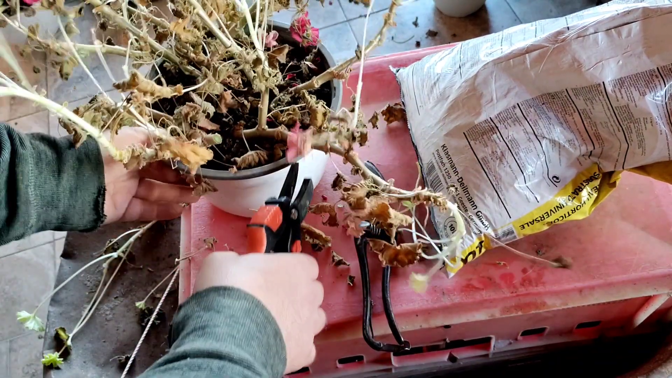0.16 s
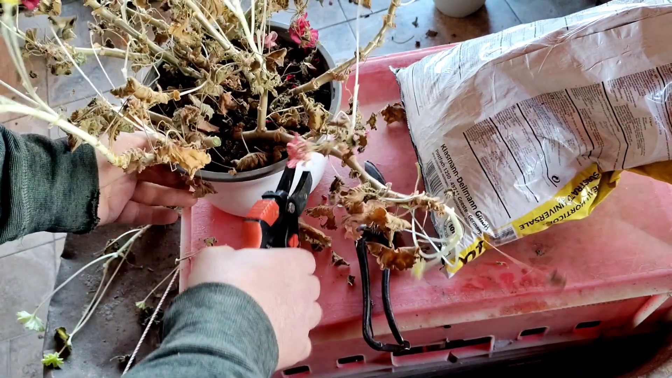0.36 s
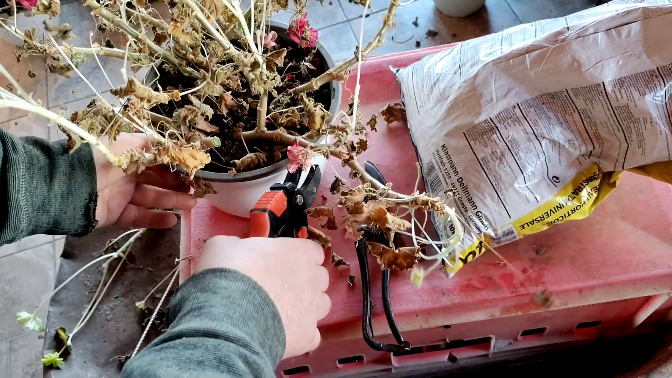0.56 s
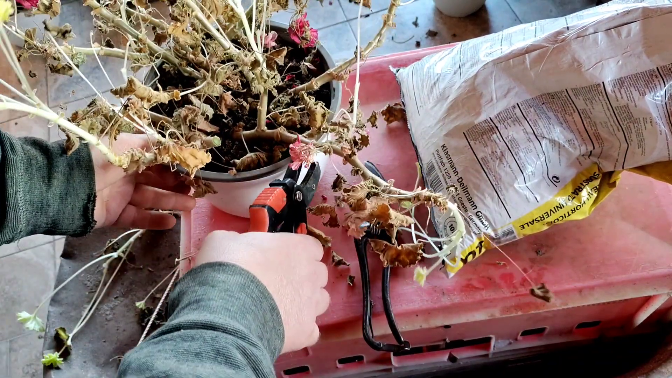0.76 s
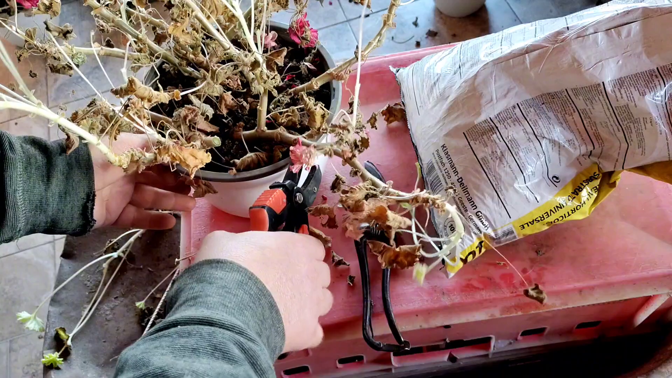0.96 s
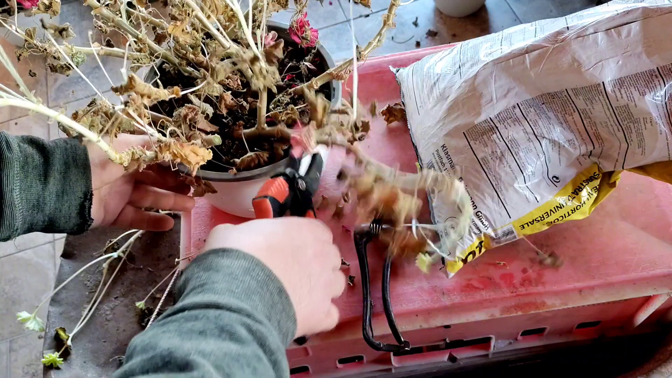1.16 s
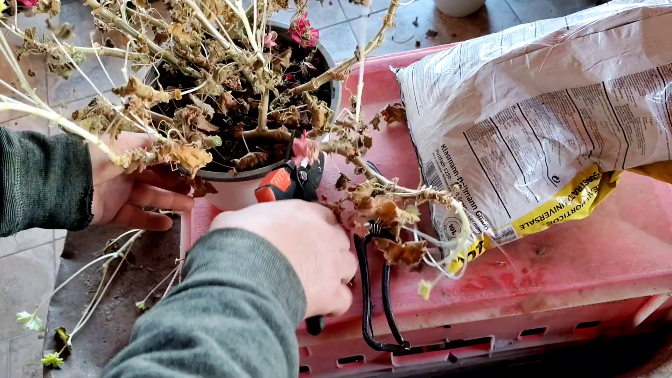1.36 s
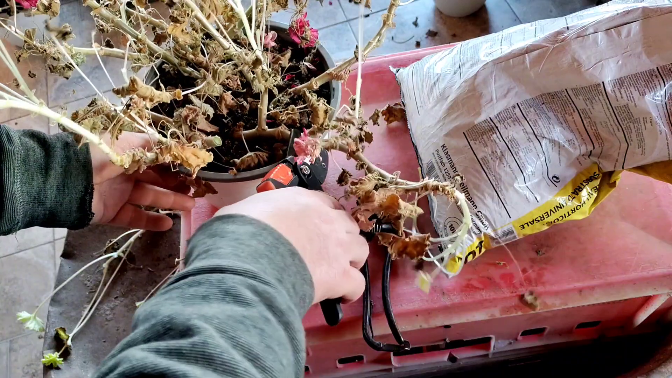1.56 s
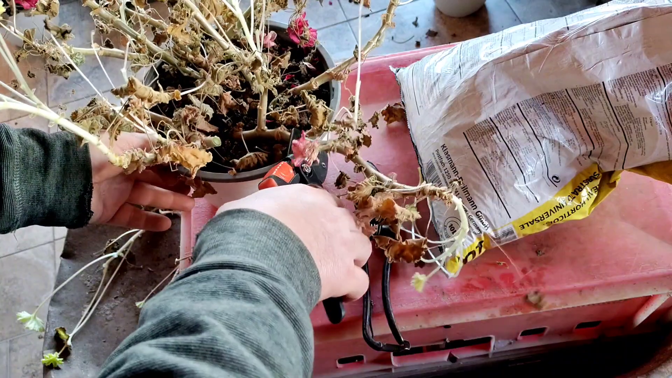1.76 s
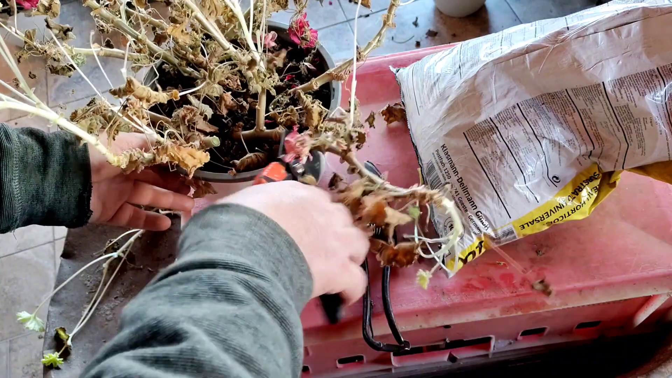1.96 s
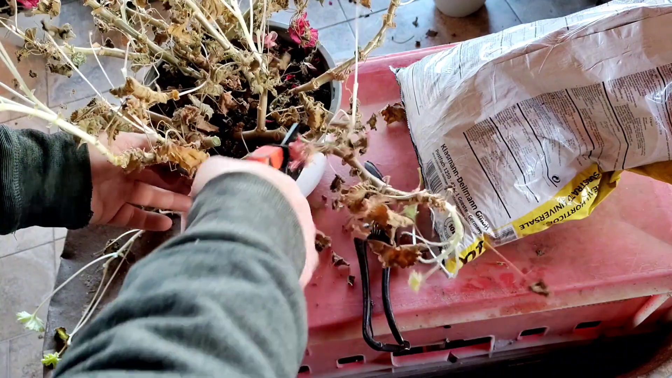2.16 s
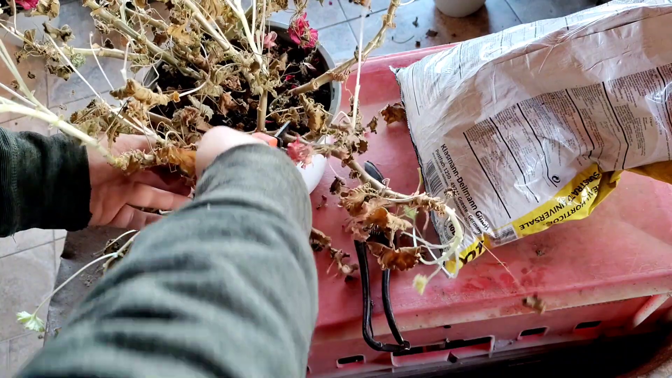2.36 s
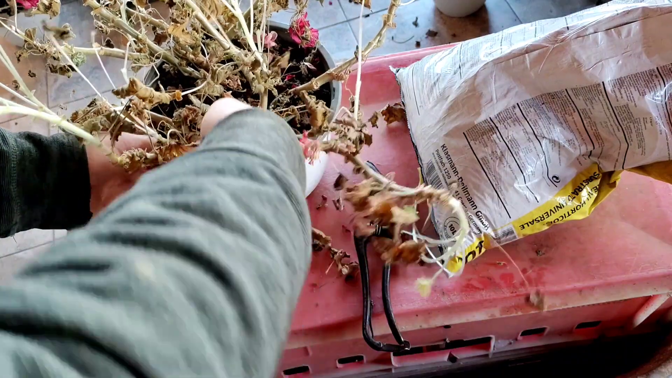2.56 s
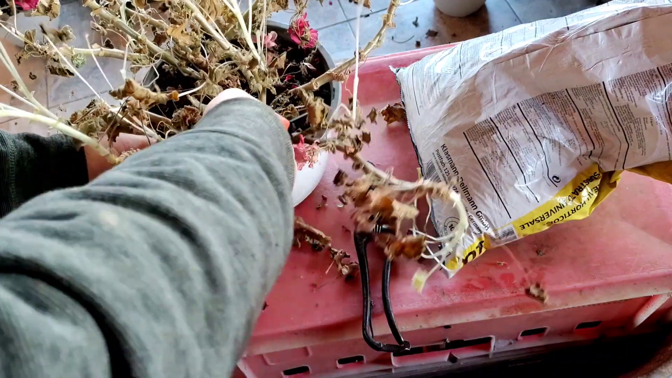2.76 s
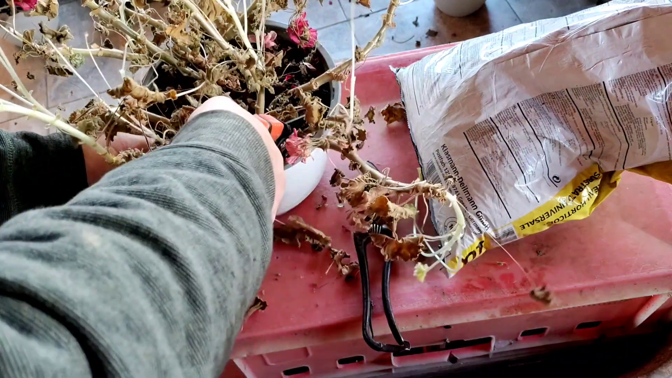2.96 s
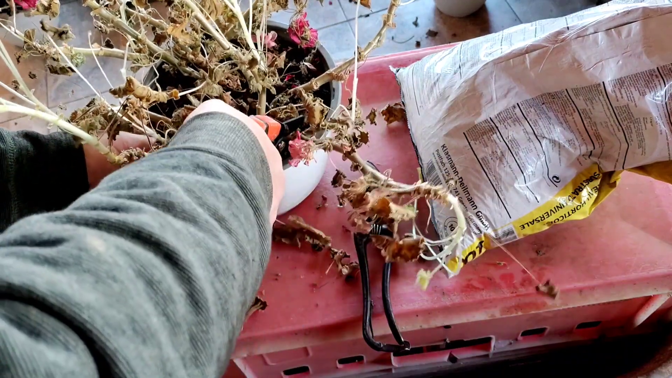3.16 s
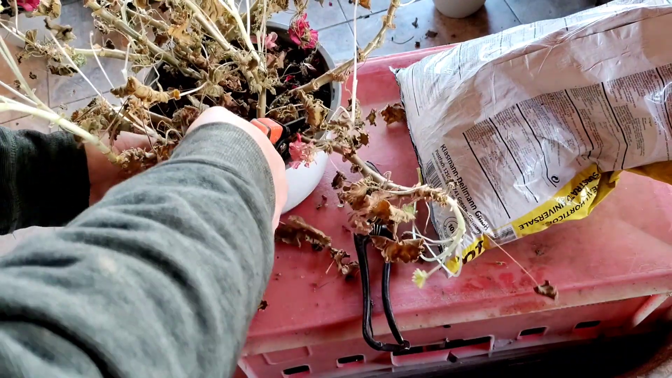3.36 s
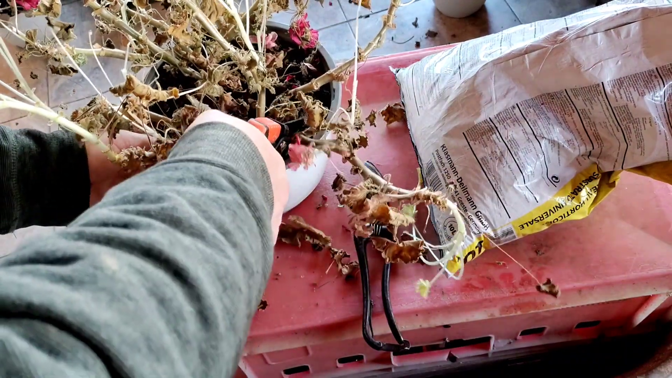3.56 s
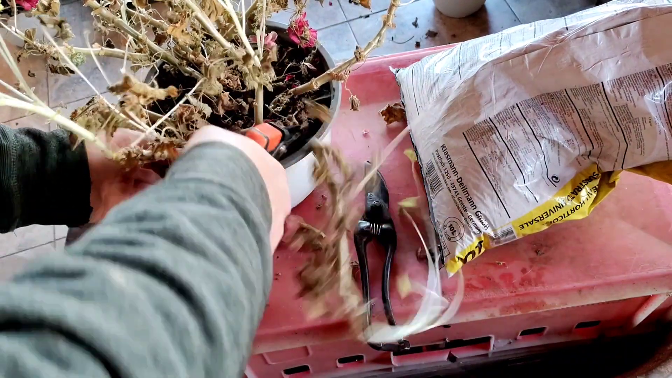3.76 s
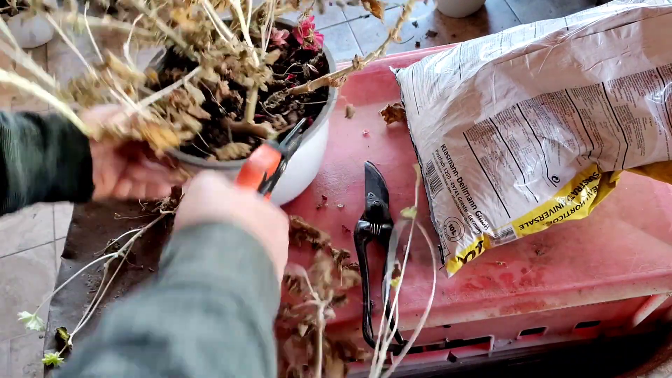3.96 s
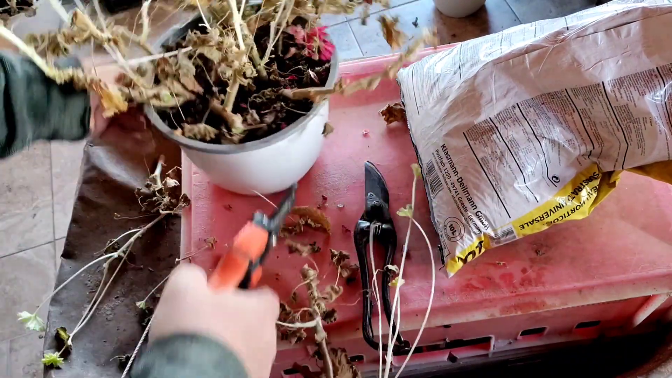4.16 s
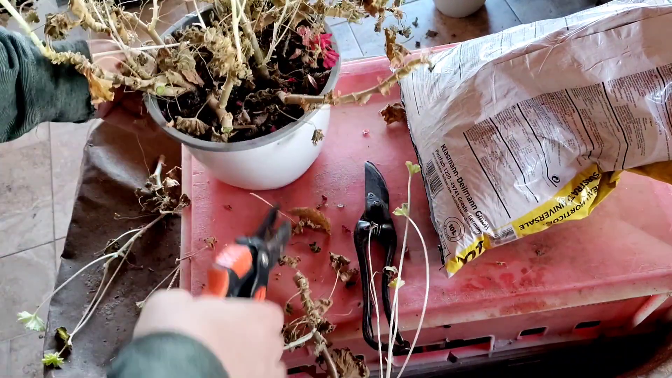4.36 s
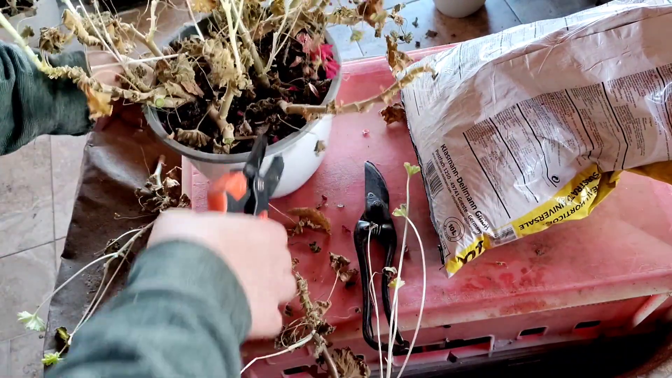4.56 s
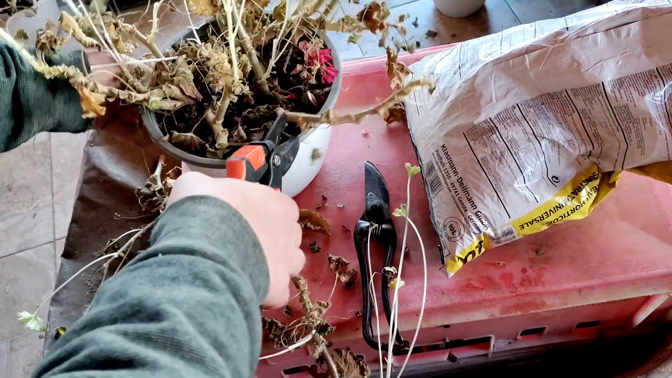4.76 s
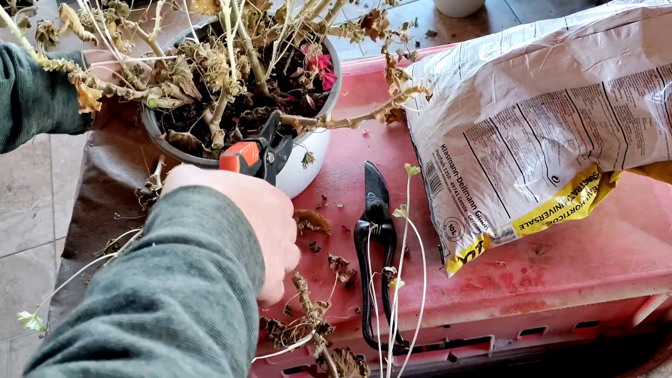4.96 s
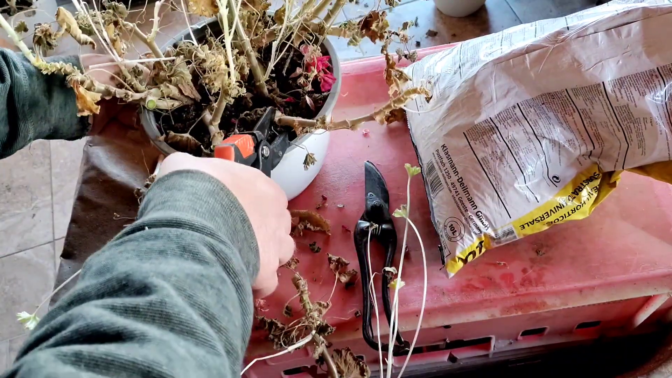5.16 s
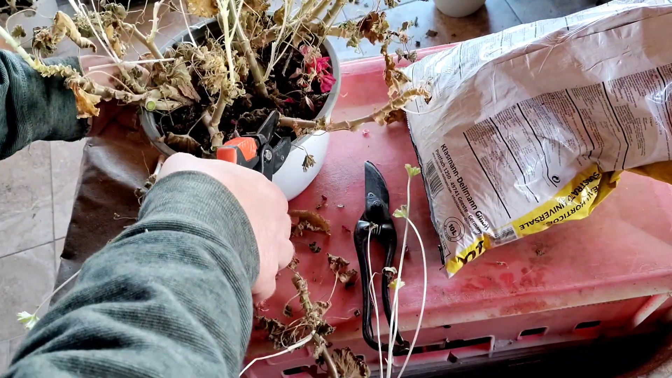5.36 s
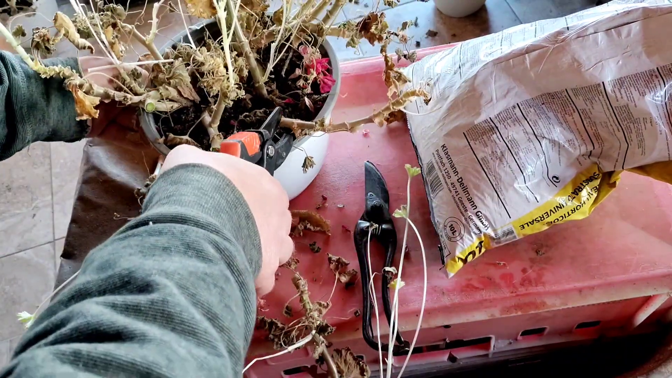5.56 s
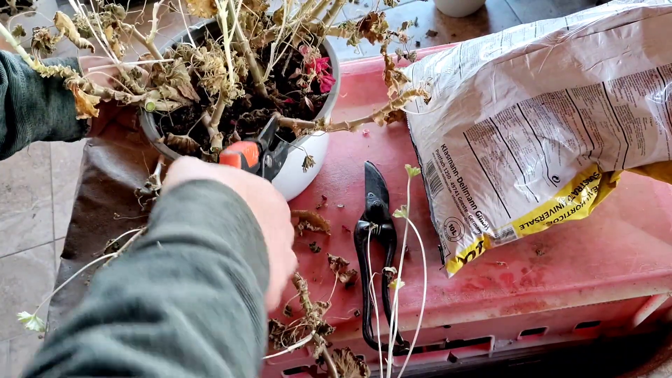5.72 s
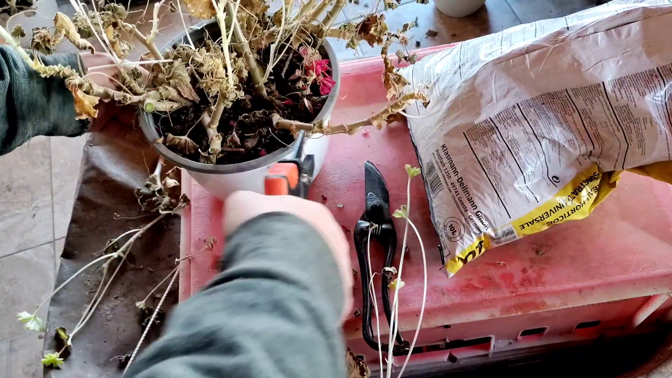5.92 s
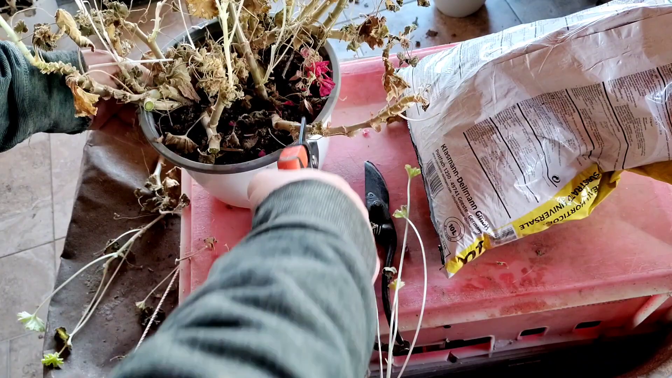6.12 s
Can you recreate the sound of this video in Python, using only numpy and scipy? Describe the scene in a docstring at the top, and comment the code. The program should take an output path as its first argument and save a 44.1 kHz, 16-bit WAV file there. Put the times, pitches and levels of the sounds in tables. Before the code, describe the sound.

Pruning shears snip dry plant stems close by, with sharp cracks, crackling dead leaves and hollow plastic thumps, while small birds chirp faintly.

```python
"""Pruning shears cut dry stems close to a two-port stereo microphone, on a tiled porch.
The potted plant stands on a hollow plastic crate: each snip or bump clacks and makes the crate thump.
Fibres crack, dead leaves rustle, a cut branch is dragged out and dropped; the pot judders on the lid
and a sleeve swishes. Far off, small birds chirp above a low outdoor rumble."""
import sys
import numpy as np
from scipy import signal
from scipy.fft import rfft, irfft, next_fast_len
from scipy.io import wavfile
from scipy.ndimage import uniform_filter1d

SR = 44100
rng = np.random.default_rng(int(sys.argv[2]) if len(sys.argv) > 2 else 0)


def put_to_file(sound):
    """Save the sound as 16-bit audio at rate SR, in the file named by the first command-line argument."""
    columns = np.atleast_2d(sound).T  # one column per channel
    safe = np.clip(columns, -1, 1)
    whole_steps = np.round(safe * 32767)
    wavfile.write(sys.argv[1], SR, whole_steps.astype(np.int16))


N = 272979
TIME = np.arange(N) / SR

# Levels are relative within each table.
# snips and bumps: t/s, clack level/dB, thump level/dB, thump f/Hz, clack f/Hz
CONTACTS = [(0.174, -45, -29.5, 147, 560), (0.191, -70, -29, 178.6, 455), (1.311, -24.5, -31.5, 185, 1170),
            (1.671, -32.5, -36.5, 185.4, 1360), (1.752, -63, -52, 167, 700), (2.011, -37.5, -43, 188, 806),
            (2.057, -59, -55, 170, 700), (2.1453, -28, -37, 171, 1860), (2.157, -35.5, -40, 188, 1890),
            (2.526, -30.5, -24, 188, 700), (2.69, -42, -37, 182, 604), (3.709, -33, -42, 185, 1600),
            (3.751, -27.5, -46, 195, 2100), (3.7552, -16.5, -29, 189, 1870), (3.764, -30, -42.5, 172, 1780),
            (3.9142, -25, -35, 177, 1435), (4.113, -19.5, -28.5, 293, 1407),
            (4.1152, -21.5, -35.5, 270.4, 1350), (4.1193, -25, -20, 174.2, 1250),
            (4.127, -30.5, -30, 175, 1350), (4.581, -88.5, -34, 178, 504), (4.696, -46.5, -33.5, 167, 416),
            (4.74, -19, -30.5, 161.7, 1622), (5.024, -48, -34, 171.6, 850), (5.43, -65, -41.5, 184, 646)]
# modes of shears, pot and crate: f/Hz, level/dB, t60/s
BODY_MODES = [(282, -21, .24), (350, -19, .2), (430, -23, .16), (478, -17, .16), (742, -25, .12),
              (798, -27, .12), (1002, -22, .12), (1050, -25, .12), (1260, -16.5, .14), (1398, -16, .14),
              (1564, -18, .12), (1697, -19, .11), (1805, -19, .11), (2191, -26, .12), (3021, -19, .15),
              (3167, -19, .15)]
# hard edge of every clack: f/Hz, Q, gain/dB
BLADE_PEAK = (3200, 5.4, 6.7)
# dry stems breaking: t/s, level/dB, t60/s, centre f/Hz
STEM_BREAKS = [(1.32, -31.5, 0.036, 10000), (1.48, -45, 0.018, 9000), (1.503, -54, .025, 9500),
               (1.52, -52, 0.025, 9000), (1.594, -43, 0.022, 9000), (1.612, -42, .025, 8500),
               (1.633, -33, 0.021, 8500), (1.755, -31.5, 0.03, 8500), (1.771, -28, 0.042, 10500),
               (1.801, -34, 0.018, 7000), (1.903, -26.5, 0.025, 9300), (1.929, -31, 0.054, 8700),
               (1.942, -28, .03, 10000), (1.96, -27.5, 0.033, 7800), (1.998, -30, .02, 7500),
               (2.036, -33, .016, 12500), (2.055, -16.5, 0.012, 10000), (2.068, -26, 0.013, 9500),
               (2.431, -36.5, 0.11, 9100), (2.527, -40, 0.042, 7840), (3.636, -48, .06, 7600),
               (3.655, -43.5, 0.1, 6460), (3.688, -36, 0.057, 8000), (3.709, -18, 0.043, 8800),
               (3.729, -20.5, .03, 11500), (3.732, -22, 0.011, 8560), (3.75, -9.5, 0.0071, 11500),
               (3.7503, -9.5, 0.0079, 4020), (3.967, -33.5, 0.058, 5450), (3.993, -24, 0.035, 9000),
               (4.008, -8.5, 0.01, 7000), (4.026, -20, 0.037, 4640), (4.039, -17.5, .026, 4440),
               (4.052, -17, 0.018, 3610), (4.069, -20, 0.0082, 3650), (4.085, -22.5, .03, 11000),
               (4.101, -19, 0.028, 10720), (4.222, -19, 0.012, 9500), (4.333, -30.5, .015, 13600),
               (4.343, -17.5, .013, 12000), (4.352, -26, 0.0096, 11600), (4.461, -32.5, 0.058, 3480),
               (4.476, -26, 0.024, 6200), (4.738, -18.5, 0.0062, 4920)]
# plant grasped, bent, pulled or dropped: t/s, length/s, leaf level/dB, stem level/dB, leaf f/Hz, stem f/Hz
HANDLING = [(0.005, 0.097, -66, -56.5, 5000, 1290), (0.098, 0.088, -60.5, -55, 6960, 1300),
            (1.301, 0.06, -52.5, -58, 10900, 1100), (1.43, 0.056, -78, -62.5, 7500, 1310),
            (1.484, 0.04, -53.5, -93, 10000, 2500), (1.585, 0.085, -57.5, -72.5, 8600, 2500),
            (1.757, 0.11, -55, -72.5, 8400, 1900), (1.89, 0.075, -45.5, -57.5, 9100, 1710),
            (1.982, 0.026, -51, -47.5, 7940, 980), (2.06, 0.074, -59.5, -63, 11400, 1800),
            (2.344, 0.019, -94, -54, 4000, 1480), (2.526, 0.059, -70.5, -52, 8000, 2900),
            (2.62, 0.078, -74, -63, 7000, 2900), (2.713, 0.083, -63, -57, 11200, 2900),
            (2.804, 0.097, -88, -67, 9000, 2900), (3.698, 0.035, -61, -38.5, 7070, 1820),
            (3.903, 0.13, -58, -69.5, 9000, 2500), (3.956, 0.15, -41, -46, 9300, 2400),
            (4.01, 0.052, -45, -52, 4400, 3000), (4.096, 0.02, -55, -38, 8020, 1400),
            (4.144, .07, -64.5, -49.5, 7030, 1350), (4.239, 0.17, -62.5, -55.5, 8150, 1100),
            (4.491, 0.12, -63.5, -71, 4506, 2520), (4.601, 0.061, -63.5, -58, 7000, 1910),
            (4.66, 0.066, -62, -56.5, 7000, 2030), (4.729, .04, -68.5, -51.5, 5050, 1450),
            (4.785, .09, -66, -55.5, 4900, 2700), (4.902, 0.18, -87, -67.5, 5020, 1900)]
# hand movements: t/s, length/s, level/dB
POT_PUSHES = [(0.013, .16, -31.5), (4.02, 0.25, -40), (4.564, 0.43, -49.5)]
ARM_SWISHES = [(-0.1, 0.53, -59), (2.66, 0.21, -67.5)]
# bird notes: t/s, length/s, start f/Hz, level/dB, rasp as a share of the pitch
BIRD_NOTES = [(0.732, 0.022, 4390, -55, 0.035), (0.759, 0.033, 4050, -66, 0.05),
              (0.796, 0.015, 3704, -60, 0.013), (0.809, 0.018, 3330, -73, 0.046),
              (0.958, 0.022, 4090, -71.5, 0.022), (0.985, 0.016, 3750, -73, 0.014),
              (1.556, 0.041, 4120, -60, 0.067), (1.607, 0.13, 3360, -63.5, 0.086),
              (2.278, 0.052, 4250, -64.5, 0.064), (2.391, 0.042, 4000, -61, 0.082),
              (2.433, 0.058, 3350, -58, 0.11), (3.042, 0.039, 4360, -64.5, 0.022),
              (3.083, 0.031, 3394, -59.5, 0.084), (3.273, 0.041, 4292, -60.5, 0.045),
              (3.304, 0.035, 2900, -67.5, 0.036), (4.992, 0.065, 4440, -58, 0.073),
              (5.049, 0.046, 3550, -57.5, 0.1), (5.674, 0.017, 4540, -64.5, 0.037),
              (5.688, 0.017, 4060, -59, 0.052), (5.723, 0.062, 3650, -65, 0.11),
              (5.78, 0.067, 3306, -62.5, 0.14)]
# swell of the distant rumble and drone: t/s, level/dB
RUMBLE_LEVELS = [(0.45, -61), (0.83, -64.5), (1.23, -59), (3.21, -56), (4.06, -49), (4.48, -50.5),
                 (4.75, -48.5), (5.77, -60), (6.19, -61)]
DRONE_LEVELS = [(0.6, -76.5), (0.85, -91.5), (1.2, -80.5), (3.05, -88), (3.25, -78.5), (3.55, -73),
                (4.0, -82), (5.7, -87.5)]
# spectra of the sources and of the porch echo: f/Hz, level/dB
FIBRE_SPECTRUM = [(300, -19), (1000, -7), (2500, 0), (4300, 4), (8000, -1.5), (12000, -8), (18000, 4)]
LEAF_SPECTRUM = [(1500, -6.5), (3000, 0), (5000, -0.5), (8000, -2), (11000, -5), (15000, -2.5), (18000, -2)]
STEM_SPECTRUM = [(300, -10), (700, 0), (1300, 1), (1750, 1), (2300, -3), (3200, -2.5), (4600, -13),
                 (7000, -16.5)]
JUDDER_SPECTRUM = [(40, -22), (80, -9.5), (110, -14), (132, 1), (190, -6.5), (270, -18.5), (500, -28),
                   (900, -38.5)]
SLEEVE_SPECTRUM = [(1500, -11), (3500, -3.5), (5500, -3), (7200, 1), (10500, -2), (12500, -15), (15000, -9)]
RUMBLE_SPECTRUM = [(22, -28), (50, -13.5), (62, -21), (78, -2.5), (100, -15.5), (125, -12.5), (160, -0.5),
                   (200, 1), (250, -7), (310, -12.5), (400, -37.5), (700, -42)]
HISS_SPECTRUM = [(500, -7.5), (1000, -6.5), (3000, -11), (8000, -11.5), (12000, -12), (14000, -23.5)]
PORCH_SPECTRUM = [(80, 4), (180, -3.5), (400, 4), (650, -2.5), (1000, -2.5), (1500, 0), (2200, -2),
                  (3200, -1.5), (5200, -1.5), (8000, 0.5), (18000, 2)]
# decay of the porch echo: f/Hz, t60/s
PORCH_DECAY = [(120, 0.55), (255, 0.08), (500, 0.62), (1000, .5), (3000, 0.42), (8000, 0.41), (15000, 0.66)]
# bass returned by the nearest walls: delay/s, level/dB
WALL_RETURNS = [(0.0257, -12.5), (0.04, -17.5)]
# diffuse sound at the microphone: f/Hz, left-right coherence
COHERENCE = [(30, 1), (150, 0.92), (300, 0.87), (600, 0.17), (1200, 0.067), (3000, 0.036)]
# colour of the microphone ports: f/Hz, Q, gain/dB
LEFT_PORT_PEAKS = [(2900, 7.7, 0), (7680, 5.7, 4.5)]
RIGHT_PORT_PEAKS = [(1240, 4.25, 0.5), (3330, 1.6, 4), (4900, 2.5, -1), (7150, 3.9, -15), (10000, 1.2, -3)]


def shears(clack_db=2.0, thump_db=9.5, thump_t60=0.074, ring_db=-43.5, scuff_s=0.013, swell_s=0.0013):
    """A short contact clacks and rings the hard parts; the crate's lid answers with a low thump."""
    clacks, thumps = np.zeros(N), np.zeros(N)
    t = TIME[:SR // 2]
    blow = signal.unit_impulse(len(t))
    for s, peak_db, lid_db, lid_hz, clack_hz in CONTACTS:
        scuff_db = min(lid_db - 22 - peak_db, -6)  # follows the thump, but stays under the clack
        scuff = from_db(scuff_db) * rng.standard_normal(len(t)) * np.exp(-t / scuff_s)
        contact = peaks(np.array([blow, scuff]), [(clack_hz, 3.3, 5), BLADE_PEAK])
        contact = cut(contact, 1.14 * clack_hz, "low")  # a softer contact has less treble
        pulse, rattle = cut(cut(contact, 3980, "low", order=12), 250, "high")
        add(clacks, s, from_db(peak_db + clack_db) * (pulse + rattle / 2) / np.abs(pulse).max())
        lid = ring(blow, lid_hz, thump_t60) * (1 - np.exp(-t / swell_s))
        add(thumps, s, -from_db(lid_db + thump_db) * lid)
    # each contact lands somewhere else and favours other modes
    modes = sum((-1) ** k * ring(clacks * from_db(db + ring_db + 2.5 * drift(4.8)), hz, t60)
                for k, (hz, db, t60) in enumerate(BODY_MODES))
    return clacks + modes + cut(thumps, 124, "high", order=4)


def fibre_breaks(count=3, gap_s=.017, loss_db=14.5):
    """Each break runs on through the next fibres at uneven intervals, each weaker than the last."""
    steps = np.arange(count) * rng.uniform(.8, 1.2, (len(STEM_BREAKS), count))
    return [(s + gap_s * k, db - loss_db * k, t60, hz)
            for (s, db, t60, hz), run in zip(STEM_BREAKS, steps) for k in run]


def cracks(crack_db=-13.0, spread_db=2.0, ringing=0.58, stem_t60=0.0084, modes=9):
    """Fibres give way in a dying run of tiny snaps; each piece of stem rings at pitches of its own."""
    track, t = np.zeros(N), TIME[:SR // 8]
    for s, db, t60, centre_hz in fibre_breaks():
        sizes = from_db(spread_db * np.minimum(rng.exponential(1, len(t)), 3))
        clicks = sizes * rng.choice([-1, 1], len(t)) * (rng.random(len(t)) < .2)
        snaps = peaks(clicks, [(centre_hz, 1.5, 7.5)])
        snaps = cut(snaps, centre_hz / 4, "high")  # a thin twig gives little bass
        snaps = rms_one(snaps) * from_db(db - 60 * t / t60)
        pitches = np.linspace(3500, 14500, modes) + rng.uniform(-700, 310, modes)
        stem = snaps.std() * rms_one(sum(ring(snaps, hz, stem_t60) for hz in pitches))
        add(track, s, (snaps + ringing * stem) / np.hypot(1, ringing))
    return from_db(crack_db) * colour(track, FIBRE_SPECTRUM)


def foliage(leaf_db=-3.5, stem_db=-4.0, stem_clump_db=3.0):
    """Dead leaves crackle in clumps; stems rasp along each other, each with a broad, woody resonance."""
    strokes = np.array([stroke(s, length, attack_s=.016, release_s=.012) for s, length, *_ in HANDLING])
    leaves = leaf_crackle(strokes) * from_db(leaf_db + drift(160))
    slips = grains(1500, spread_db=2.5) * from_db(stem_db + stem_clump_db * drift(90))
    slips = colour(slips, STEM_SPECTRUM)
    stems = np.zeros(N)
    for (s, _, _, db, _, hz), effort in zip(HANDLING, strokes):
        span = slice(round(s * SR), round(s * SR) + SR // 2)
        rasp = slips.std() * rms_one(peaks(slips[span], [(hz, 3.4, 6.5)]))
        stems[span] += from_db(db) * effort[span] * rasp
    stems = cut(stems, 3870, "low", order=12)
    stems = peaks(stems, [(hz, 52, 2) for hz, _, _ in BODY_MODES])  # pot and crate sing along faintly
    return colour(leaves, LEAF_SPECTRUM) + stems


def leaf_crackle(strokes, per_s=750, cycles=22.0, count=20, width_octaves=0.6):
    """Each tiny break rings a bit of dry plant briefly; thin leaves ring high, twigs lower."""
    clicks, piece = grains(per_s, spread_db=3.5), rng.integers(0, count, N)
    pitches = np.geomspace(2200, 15000, count)
    _, _, db, _, centre_hz, _ = np.transpose(HANDLING)
    shares = np.exp(-.5 * (np.log2(pitches[:, None] / centre_hz) / width_octaves) ** 2)
    gains = (from_db(db) * shares / np.linalg.norm(shares, axis=0)) @ strokes
    return sum(gain * rms_one(ring(clicks * (piece == k), hz, cycles / hz))
               for k, (hz, gain) in enumerate(zip(pitches, gains)))


def pot_judder(judder_db=-2.5, slip_hz=130.3, uneven=0.0806):
    """The pushed pot sticks and slips on the lid in uneven, gritty steps."""
    steps = np.floor(np.cumsum(slip_hz * np.exp(uneven * drift(60))) / SR)
    slips = rms_one(np.diff(steps, prepend=0)) + rng.standard_normal(N)
    force = sum(from_db(db) * stroke(s, length, attack_s=.085, release_s=.055)
                for s, length, db in POT_PUSHES)
    return from_db(judder_db) * force * rms_one(colour(slips, JUDDER_SPECTRUM))


def sleeve():
    """Cloth slides on cloth: a smooth hiss that swells and fades with the speed of the arm."""
    speed = sum(from_db(db) * np.sin(np.pi * np.clip((TIME - s) / length, 0, 1)) ** 2
                for s, length, db in ARM_SWISHES)
    return speed * colour(rng.standard_normal(N), SLEEVE_SPECTRUM)


def near_echoes(x, echo_db=-9.5, above_hz=1770.0, count=5):
    """Pot, lid and sack throw the treble back within a few milliseconds, differently to each port."""
    treble = cut(x, above_hz, "high")
    lags = (rng.uniform(.0006, .007, (2, count)) * SR).astype(int)
    echoes = [sum(np.pad(treble, (lag, 0))[:N] for lag in side) for side in lags]
    return from_db(echo_db) * np.array(echoes)


def wall_echoes(x, below_hz=1700.0):
    """The nearest walls send each thump back; one echo prolongs the ring and the next cuts it short."""
    bass = cut(x, below_hz, "low", order=1)
    return sum(from_db(db) * np.pad(bass, (round(s * SR), 0))[:N] for s, db in WALL_RETURNS)


def porch(x, wet_db=-3.0, build_s=0.0027):
    """Dense reflections from tiles and walls, each octave dying at its own rate."""
    t, hz, edges = TIME[:SR], np.arange(SR // 2 + 1), 45 * 2 ** np.arange(10)
    noise, response = rfft(diffuse(SR)), 0
    for low, high in zip(edges, edges[1:]):
        t60 = at_hz(PORCH_DECAY, np.sqrt(low * high))
        band = irfft(noise * ((hz >= low) & (hz < high)))
        response += band * from_db(-60 * t / t60) * np.sqrt(2 * np.log(1000) / t60 / SR)
    response = colour(even_out(response) * (1 - np.exp(-t / build_s)), PORCH_SPECTRUM)
    return from_db(wet_db) * signal.fftconvolve(x[None], response, axes=1)[:, :N]


def even_out(response, fine_hz=25, broad_hz=300, end_s=.7):
    """Many paths leave the echo without strong pitches of its own."""
    spectrum = rfft(response)
    power = (np.abs(spectrum) ** 2).mean(0) + 1e-9
    gain = np.sqrt(uniform_filter1d(power, broad_hz) / uniform_filter1d(power, fine_hz))
    return irfft(spectrum * gain) * (TIME[:SR] < end_s)


def birds(fall_octaves_per_s=3, echo_t60=0.4, arrive_s=0.0011):
    """Far, raspy falling notes, a whistle and a low hoot reach the microphone only off the walls."""
    def note(hz, rasp):
        """A tone with soft ends whose pitch shakes quickly and unevenly."""
        shake = 1 + rasp * drift(450)[:len(hz)]
        return signal.windows.tukey(len(hz), .5) * np.sin(2 * np.pi * np.cumsum(hz * shake) / SR)

    song = np.zeros(N)
    for s, length, start_hz, db, rasp in BIRD_NOTES:
        t = TIME[:int(length * SR)]
        add(song, s, from_db(db) * note(start_hz * 2 ** (-fall_octaves_per_s * t), rasp))
    whistle_hz = np.geomspace(2440, 2154, int(.26 * SR))
    add(song, .14, from_db(-65) * note(whistle_hz, rasp=.047))
    hoot_hz = np.full(int(.08 * SR), 566)
    hoot = note(hoot_hz, rasp=.083) + from_db(-10) * note(2 * hoot_hz, rasp=.083)
    add(song, 6.01, from_db(-65) * hoot)
    t = TIME[:SR]
    walls = rms_one(diffuse(SR) * from_db(-60 * t / echo_t60) * (1 - np.exp(-t / arrive_s)))
    return signal.fftconvolve(song[None], walls / np.sqrt(SR), axes=1)[:, :N]


def background(rumble_db=2.5, hiss_db=-79.0, drone_hz=504.3, ring_t60=0.0285):
    """Far rumble with a faint drone in it that swells now and then, and a thin even hiss."""
    rumble = rms_one(colour(diffuse(N), RUMBLE_SPECTRUM))
    rumble *= from_db(rumble_db + np.interp(TIME, *np.transpose(RUMBLE_LEVELS)))
    drone = rms_one(ring(ring(diffuse(N), drone_hz, ring_t60), drone_hz, ring_t60))
    drone *= from_db(np.interp(TIME, *np.transpose(DRONE_LEVELS)))
    return rumble + drone + from_db(hiss_db) * colour(diffuse(N), HISS_SPECTRUM)


def stroke(s, length, attack_s, release_s):
    """Envelope of one hand movement: it builds up, holds and dies away."""
    rise = np.clip((TIME - s) / attack_s, 0, 1)
    return rise * np.exp(-np.clip((TIME - s - length) / release_s, 0, 20))


def grains(per_s, spread_db):
    """Random clicks of very uneven size; rms 1."""
    sizes = from_db(spread_db * np.minimum(rng.exponential(1, N), 4)) * rng.choice([-1, 1], N)
    return rms_one(sizes * (rng.random(N) < per_s / SR))


def diffuse(size):
    """White stereo noise from all around: alike in the bass, unrelated in the treble."""
    padded = next_fast_len(size)
    mid, side = rfft(rng.standard_normal((2, padded)))
    hz = np.maximum(np.arange(len(mid)) * SR / padded, 1)
    alike = np.clip(at_hz(COHERENCE, hz), 0, .995)
    spectra = np.sqrt((1 + alike) / 2) * mid + np.sqrt((1 - alike) / 2) * side * [[1], [-1]]
    return irfft(spectra, padded)[:, :size]


def drift(per_s):
    """A line wandering between random values of spread 1."""
    knots = rng.standard_normal(int(N / SR * per_s) + 2)
    return np.interp(TIME * per_s, np.arange(len(knots)), knots)


def ring(clicks, hz, t60):
    """A unit click sets a sine of height 1 ringing."""
    r, w = from_db(-60 / (t60 * SR)), 2 * np.pi * hz / SR
    return signal.lfilter([0, np.sin(w)], [1, -2 * r * np.cos(w), r * r], clicks + 1e-18)


def peaks(x, bumps):
    """A chain of peaks and notches, each f/Hz, Q, gain/dB."""
    for hz, q, db in bumps:
        w, a = 2 * np.pi * min(hz, .45 * SR) / SR, from_db(db / 2)
        k, middle = np.sin(w) / (2 * q), -2 * np.cos(w)
        x = signal.lfilter([1 + k * a, middle, 1 - k * a], [1 + k / a, middle, 1 - k / a], x)
    return x


def cut(x, hz, kind, order=2):
    """Butterworth low- or high-pass."""
    return signal.sosfilt(signal.butter(order, hz, kind, fs=SR, output="sos"), x + 1e-18)


def colour(x, spectrum, size=8192):
    """Minimum-phase filter with this spectrum, rolled off at both ends; keeps white noise's power."""
    hz = np.maximum(np.arange(size // 2 + 1) * SR / size, 1)
    skirts = (1 + (spectrum[0][0] / hz) ** 4 / 4) * (1 + (hz / spectrum[-1][0]) ** 4 / 4)
    cepstrum = irfft(np.log(rms_one(from_db(at_hz(spectrum, hz)) / skirts) + 1e-6))
    cepstrum[1:size // 2] *= 2
    response = irfft(np.exp(rfft(cepstrum[:size // 2], size)))
    filtered = signal.fftconvolve(np.atleast_2d(x), response[None], axes=1)
    return filtered[:, :x.shape[-1]].reshape(x.shape)


def at_hz(points, hz):
    """Read a table on a log-frequency axis."""
    freqs, values = np.transpose(points)
    return np.interp(np.log(hz), np.log(freqs), values)


def add(track, s, sound):
    """Mix a sound in at a time."""
    start = round(s * SR)
    track[start:start + len(sound)] += sound[:N - start]


def from_db(db):
    """Decibels to gain."""
    return 10 ** (np.asarray(db) / 20)


def rms_one(x):
    """Scale to rms 1."""
    return x / np.sqrt(np.mean(x ** 2) + 1e-20)


def scene(port_lag_s=.0001, side_lag_s=.0002):
    """The work is close by and reaches the left port first; half the foliage hangs further left."""
    near_foliage, side_foliage = foliage() / np.sqrt(2), foliage() / np.sqrt(2)
    centre = shears() + cracks() + pot_judder() + sleeve() + near_foliage
    left = centre + side_foliage
    right = np.roll(centre, round(port_lag_s * SR)) + np.roll(side_foliage, round(side_lag_s * SR))
    echoes = near_echoes(left) + wall_echoes(left) + porch(left)
    return np.array([left, right]) + echoes + birds() + background()


def record(dry, cutoff_hz=15750):
    """Each microphone port colours its side; the top is cut steeply."""
    heard = np.array([peaks(dry[0], LEFT_PORT_PEAKS), peaks(dry[1], RIGHT_PORT_PEAKS)])
    return signal.sosfilt(signal.ellip(10, .2, 80, cutoff_hz, fs=SR, output="sos"), heard)


dry = scene()
out = record(dry)
put_to_file(out)
```